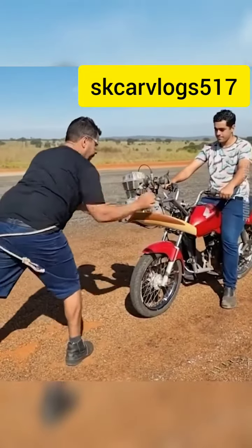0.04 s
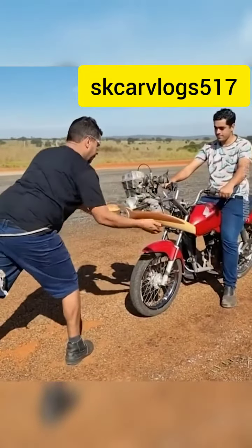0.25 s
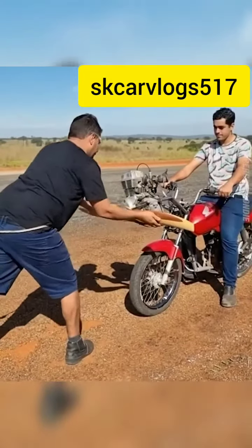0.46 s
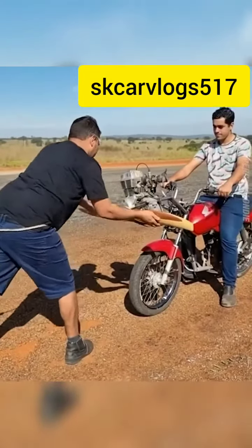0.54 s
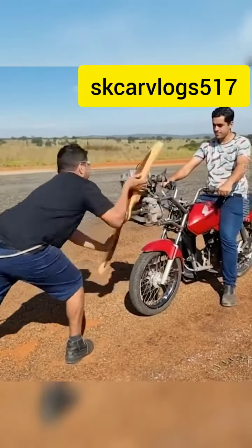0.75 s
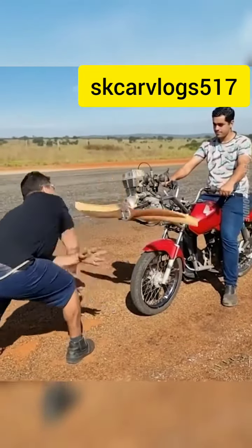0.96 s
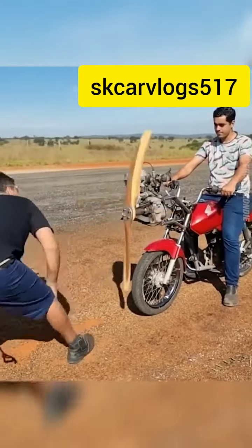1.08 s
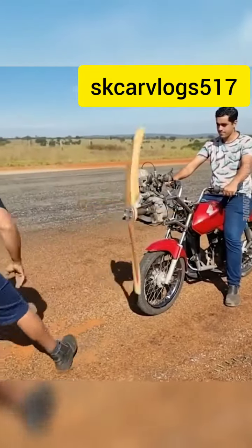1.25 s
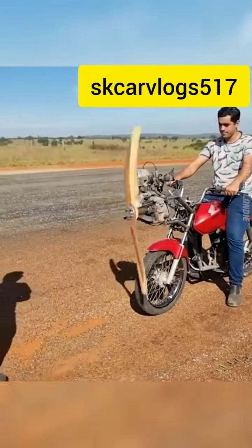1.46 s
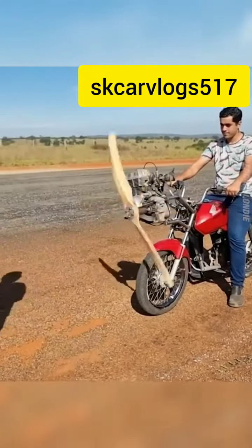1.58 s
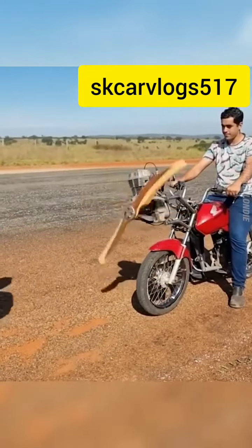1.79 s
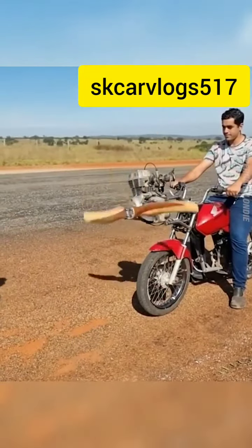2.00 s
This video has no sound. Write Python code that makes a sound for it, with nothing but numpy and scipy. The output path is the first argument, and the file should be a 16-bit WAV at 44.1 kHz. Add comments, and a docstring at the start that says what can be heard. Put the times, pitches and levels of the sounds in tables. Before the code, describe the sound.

A small motorcycle engine is started by hand-swinging a wooden propeller. Low, soft wind and faint ticks at about 0.24, 0.4, 0.5 and 0.8 seconds lead to a metallic clank at 0.89. A loud spitting pop follows at 0.98, then a weak puff at 1.1. From 1.2 hollow, whooping exhaust chugs quicken and strengthen, with rattles and airy churning, still running at 2.0. Open, dry outdoor space.

```python
"""Hand-swung piston engine start

A small engine, swung by its wooden propeller, clanks, pops, catches and chugs ever faster in the open.
Each firing is a short rising whoop: a pressure drop and a swept whistle ring the silencer chambers.
Valve spits are bursts of noise; gear rattles are volleys of knocks through casing resonances, with a few
ringing pings. Shaped noise makes the churn and hiss of the turning engine and the low wind with its rustle.
"""
import sys
import numpy as np
from scipy import signal
from scipy.fft import rfft, irfft, next_fast_len
from scipy.io import wavfile
from scipy.ndimage import uniform_filter1d, map_coordinates

SR = 44100
rng = np.random.default_rng(int(sys.argv[2]) if len(sys.argv) > 2 else 0)


def volts_from_decibels(level):
    """Turn decibel levels (scalar or array-like) into linear amplitude factors."""
    exponent = np.asarray(level, float) / 20
    return 10 ** exponent


def materialize(psi):
    """Save the field psi as 16-bit PCM at rate SR to the path in sys.argv[1].

    A 1-D psi becomes a single channel; in a 2-D psi each row is a channel.
    """
    bounded = np.clip(np.atleast_2d(psi).T, -1, 1)
    quanta = np.round(bounded * 32767).astype(np.int16)
    wavfile.write(sys.argv[1], SR, quanta)


N = 89611

# Exhaust firings. Each row: start in seconds [s], relative level [dB], whistle sweep [Hz per ms],
# pressure drop relative to the whistle [dB].
FIRINGS = [(.986, -9.5, 52.8, 19.5), (1.0979, -27, 31.5, 27), (1.202, -17, 34.6, 22.5),
           (1.3051, -13, 48, 19), (1.3879, -14, 46.5, 19.5), (1.4681, -10, 57, 16),
           (1.5419, -9.5, 58.6, 16.5), (1.6148, -10.5, 59.3, 18.5), (1.6828, -8.4, 65, 16),
           (1.748, -9, 64.5, 17), (1.813, -9, 65.2, 14.8), (1.8746, -8.5, 63, 13), (1.9383, -8.5, 70.3, 15),
           (1.9939, -6.5, 76.6, 14.5)]
# Silencer chambers. Each row: resonance [Hz], width [Hz], gain [dB].
SILENCER_MODES = [(313, 106, 1), (555, 64, .8), (746, 56, 3.8), (860, 125, 4.3), (1200, 110, 1)]
# Gas sloshing in the silencer box. One row: resonance [Hz], width [Hz], gain [dB].
THUMP_MODE = (73.4, 24, -16.5)
WHISTLE_START_HZ, WHISTLE_END_HZ, WHISTLE_FADE_HZ = 203, 1170, 130
WHISTLE_REF_HZ, WHISTLE_FALL_POWER = 500, 1.64  # level falls as this power of pitch
WHISTLE_RISE_S, WHISTLE_PHASE_TURNS, DROP_PEAK_S = .0052, .66, .0038
AFTERRING_DB, AFTERRING_T60_S, AFTERRING_DELAY_S = -16, .045, .005
EXHAUST_PAN_DB, EXHAUST_SCATTER_DB = -2.5, -9.5  # pan: left over right

# Valve spits just ahead of firings. Each row: start in seconds [s], level [dB].
SPITS = [(0.982, -10.5), (1.196, -30), (1.303, -25.5), (1.384, -31), (1.464, -26.5), (1.538, -28.5),
         (1.609, -26), (1.679, -25.5), (1.743, -27.5), (1.811, -28.5), (1.871, -34.5), (1.934, -28.5),
         (1.990, -22)]
# Spit spectrum. Each row: frequency [Hz], relative density [dB per Hz].
SPIT_SPECTRUM = [(710, -19.5), (1200, -14), (2070, -7), (2520, -13.5), (3200, -18.5), (3820, -22),
                 (7190, -20), (10500, -36.5), (14100, -26.5), (15100, -36), (16300, -37)]
SPIT_RISE_S, SPIT_T60_S = 0.0016, 0.038

# Gear and valve-train rattles. Each row: start in seconds [s], level [dB], hold [s].
RATTLES = [(0.8886, -25, 0.016), (.925, -54, 0.0075), (0.9406, -39.5, 0.0051), (0.944, -38, 0.0033),
           (0.969, -36.5, 0.0095), (0.981, -21, 0.015), (1.057, -35.5, 0.0067), (1.132, -42.5, 0.0087),
           (1.155, -38, 0.005), (1.194, -33, 0.0097), (1.216, -42.5, 0.0049), (1.27, -44, 0.015),
           (1.329, -27, 0.0034), (1.339, -37.5, 0.0038), (1.349, -44, 0.0078), (1.391, -40, 0.034),
           (1.468, -31.5, 0.02), (1.545, -35.5, 0.0056), (1.612, -35, 0.0016), (1.681, -42.5, 0.0081),
           (1.704, -39.5, 0.015), (1.745, -60, 0.003), (1.813, -41.5, 0.013), (1.857, -46, 0.017),
           (1.94, -44, 0.0091), (1.99, -61, 0.0063)]
# Light knocks while the blade is set. Each row: time in seconds [s], level ahead of the tick low-pass [dB].
TICKS = [(0.24, -39.5), (.249, -54), (0.391, -41), (0.398, -46), (0.523, -32.5), (.528, -57), (.795, -44)]
# Engine casing. Each row: resonance [Hz], width [Hz], gain [dB].
CASING_MODES = [(770, 64, -0.5), (1067, 63, -1), (1384, 95, 4), (1640, 202, 0), (2095, 237, 1.5),
                (2410, 340, -9.5), (2550, 108, -7.5), (4470, 970, -20.5), (4820, 400, -16),
                (6220, 730, -22), (6820, 800, -24.5)]
# Ringing knocks on one part of the gear. Each row: start in seconds [s], pitch [Hz], level [dB], T60 [s].
PINGS = [(.889, 1384, -15.5, 0.023), (0.895, 1410, -20, 0.063), (.946, 1390, -33, 0.055),
         (1.193, 1405, -32.5, 0.067), (1.3396, 4780, -30, 0.021), (1.35, 1424, -31, .06),
         (1.612, 2294, -29, 0.017), (1.68, 2140, -28, 0.026), (1.709, 2030, -31, 0.036)]
KNOCK_RISE_S, RATTLE_T60_S, KNOCKS_PER_S, KNOCK_SCATTER_DB = .0006, .03, 4000, 1.5
CASING_LOW_HZ, CASING_TOP_HZ, TICK_TOP_HZ, FIRST_KNOCK_DB = 626, 6900, 3470, 4
GEAR_PAN_DB, GEAR_SCATTER_DB = 0, -6.5

# Turning engine. Each row: time in seconds [s], churn level ahead of CHURN_GAIN_DB [dB], hiss level [dB].
RUNNING = [(.885, -46, -86), (.93, -54, -77), (.965, -51.5, -66), (1.0, -34.5, -55), (1.04, -51, -64),
           (1.08, -41, -64), (1.12, -56.5, -72), (1.18, -53.5, -68), (1.25, -53, -61), (1.3, -41, -63),
           (1.37, -42.5, -61.5), (1.44, -44.5, -58.5), (1.52, -48.5, -61.5), (1.6, -51, -59.5),
           (1.72, -48.5, -60), (1.8, -48, -62), (1.9, -49.5, -63), (2.03, -49, -71)]
# Churn spectrum. Each row: frequency [Hz], relative density [dB per Hz].
CHURN_SPECTRUM = [(18, -41), (45, 5.5), (187, -2.5), (483, -5), (786, -2.5), (1370, -1.5), (1770, -4),
                  (2130, -9.5), (2940, -13), (6170, -22.5), (7600, -23.5), (9880, -44), (16700, -120)]
# Hiss spectrum. Each row: frequency [Hz], relative density [dB per Hz].
HISS_SPECTRUM = [(6000, -57), (7800, -3), (9500, -3), (11500, -0.5), (14000, 4.5), (15200, -4),
                 (16300, -23), (17000, -90)]
# Engine noise width. Each row: frequency [Hz], left-right correlation [-1 to 1].
ENGINE_CORRELATION = [(40, 0.31), (150, 1), (600, 0.57), (2000, 0.44), (5000, 0.22), (10000, 0.33)]
CHURN_GAIN_DB, CHURN_START_S, CHURN_RAMP_S = 5.5, .885, .0112

# Wind. Each row: time in seconds [s], relative strength [dB], extra rustle [dB].
WIND = [(0, -52, 6.5), (.08, -48, 1.5), (.15, -50, 1.4), (.25, -47.5, 4.5), (.36, -47, 1.1), (.43, -50, 4),
        (.5, -43, 4), (.58, -53, 3), (.68, -49, 3), (.8, -46.5, 2.5), (.9, -45.5, 7), (1.2, -47.5, -1),
        (1.6, -49.5, 11), (2.03, -50, -15)]
# Breeze spectrum. Each row: frequency [Hz], relative density [dB per Hz].
BREEZE_SPECTRUM = [(15, -30), (35, -26), (86, -18.5), (162, -1), (291, -2.5), (401, -8), (537, -19),
                   (700, -37), (910, -50), (1540, -120)]
# Rustle spectrum. Each row: frequency [Hz], relative density [dB per Hz].
RUSTLE_SPECTRUM = [(290, -36), (500, -2), (1450, -16), (1970, -19.5), (3220, -25.5), (4920, -32),
                   (10500, -47), (12000, -52), (15600, -78), (22000, -120)]
# Wind width. Each row: frequency [Hz], left-right correlation [-1 to 1].
WIND_CORRELATION = [(60, 0.97), (180, 1), (550, 0.94), (1650, 0.27), (4970, -0.44), (15000, 0.8)]
BREEZE_GAIN_DB, RUSTLE_GAIN_DB, WIND_PAN_DB = 2, -10, -1.3

# Narrow dips in the treble. Each row: centre [Hz], width [Hz], gain [dB].
TREBLE_DIPS = [(3300, 524, -7.5), (8090, 360, -3), (10580, 250, -19)]
MIC_LOW_HZ = 64
GROUND_T60_S, GROUND_LOW_HZ = 0.05, 203


def along(points, hz):
    """Interpolates (Hz, value) points on a log frequency axis."""
    f, v = np.transpose(points)
    return np.interp(np.log(hz + 1), np.log(f + 1), v)


def curve(rows):
    """One value per sample for each column after the time."""
    s, *cols = np.transpose(rows)
    return [np.interp(np.arange(N) / SR, s, c) for c in cols]


def unit(x):
    """Scales to rms 1."""
    return x / np.sqrt(np.mean(x ** 2) + 1e-20)


def wobble(knots_per_s):
    """Smooth random curve through normally distributed knots."""
    knots = rng.standard_normal(int(N * knots_per_s / SR) + 4)
    return map_coordinates(knots, [np.arange(N) * knots_per_s / SR])


def filtered(x, response):
    """Applies a complex response of frequency in Hz."""
    m = next_fast_len(N + SR // 2)
    return irfft(rfft(x, m) * response(np.fft.rfftfreq(m, 1 / SR)), m)[..., :N]


def resonance(f, hz, width_hz, db):
    """Response of a damped resonator that peaks at hz with the given gain."""
    return volts_from_decibels(db) * 1j * f * width_hz / (hz * hz - f * f + 1j * f * width_hz)


def pan_gains(pan_db):
    """Left and right gains, pan_db apart."""
    return volts_from_decibels(np.array([[.5], [-.5]]) * pan_db)


def rush(spectrum, correlation, patchy_db):
    """Stereo noise of rms 1 with time-frequency patches of random gain."""
    z = signal.stft(rng.standard_normal((2, N)), nperseg=512)[2]
    field = uniform_filter1d(rng.standard_normal(z.shape[1:]), 6, 0)
    field = uniform_filter1d(field, 6, 1)
    pair = signal.istft(z * volts_from_decibels(patchy_db * unit(field)), nperseg=512)[1][:, :N]

    def mid_side(hz):
        angle = np.arccos(np.clip(along(correlation, hz), -1, 1)) / 2
        return volts_from_decibels(along(spectrum, hz)) * np.array([np.cos(angle), np.sin(angle)])

    mid, side = filtered(pair, mid_side)
    return unit(np.array([mid + side, mid - side]))


def bursts(rows, rise_s, t60_s):
    """Sums envelopes of (s, dB, held s) rows: rise, hold, exponential decay."""
    t = np.arange(N) / SR
    envelope = np.zeros(N)
    for s, db, held_s in rows:
        decay = volts_from_decibels(db - 60 * np.clip(t - s - held_s, 0, None) / t60_s)
        envelope += decay * (1 - np.exp(-np.clip(t - s, 0, None) / rise_s))
    return envelope


def placed(x, pan_db, scatter_db):
    """Panned, with short ground scatter, new each 0.1 s, that differs between the channels."""
    step = SR // 10
    t, wet = np.arange(step) / SR, np.zeros((2, N + 2 * step))
    for k in range(0, N, step):
        tail = rng.standard_normal((2, step)) * volts_from_decibels(-60 * t / GROUND_T60_S)
        piece = signal.fftconvolve(x[None, k:k + step], tail / np.linalg.norm(tail[0]), axes=1)
        wet[:, k:k + piece.shape[1]] += piece
    wet = filtered(wet[:, :N], lambda f: 1j * f / (GROUND_LOW_HZ + 1j * f))
    return (x + volts_from_decibels(scatter_db) * wet) * pan_gains(pan_db)


def exhaust():
    """At each firing pressure drops and the opening valve whistles upward; both ring the silencer."""
    size = 8192
    f, t = np.fft.rfftfreq(size, 1 / SR), np.arange(size) / SR
    out = np.zeros(N + size)
    box = sum(resonance(f, *mode) for mode in SILENCER_MODES) - resonance(f, *THUMP_MODE)
    for s, db, sweep_hz_per_ms, drop_db in FIRINGS:
        pitch = WHISTLE_START_HZ + 1000 * sweep_hz_per_ms * t
        swell = (1 - np.exp(-t / WHISTLE_RISE_S)) * (pitch / WHISTLE_REF_HZ) ** -WHISTLE_FALL_POWER
        swell *= (1 - np.tanh((pitch - WHISTLE_END_HZ) / WHISTLE_FADE_HZ)) / 2
        turns = (pitch + WHISTLE_START_HZ) / 2 * t + WHISTLE_PHASE_TURNS
        whistle = swell * np.sin(2 * np.pi * turns)
        drop = volts_from_decibels(drop_db) * t / DROP_PEAK_S * np.exp(-t / DROP_PEAK_S)
        # the shell's irregular afterring
        after = rng.standard_normal(size) * volts_from_decibels(-60 * t / AFTERRING_T60_S) * (t > AFTERRING_DELAY_S)
        path = box * (1 + volts_from_decibels(AFTERRING_DB) * rfft(after / np.linalg.norm(after)))
        out[round(s * SR):][:size] += volts_from_decibels(db) * irfft(rfft(whistle - drop) * path, size)
    return placed(out[:N], EXHAUST_PAN_DB, EXHAUST_SCATTER_DB)


def spits():
    """A short wide hiss as the valve cracks open: enveloped noise."""
    envelope = bursts([(s, db, 0) for s, db in SPITS], SPIT_RISE_S, SPIT_T60_S)
    return envelope * rush(SPIT_SPECTRUM, ENGINE_CORRELATION, patchy_db=6.0)


def casing(f):
    """Casing response: resonances of alternating sign, with the bass and top rolled off."""
    modes = sum((-1) ** k * resonance(f, *mode) for k, mode in enumerate(CASING_MODES))
    return modes / (1 + (CASING_LOW_HZ / (f + 1)) ** 4) / (1 + (f / CASING_TOP_HZ) ** 12)


def rattles():
    """Volleys of small knocks, each led by a single knock, and soft single ticks ring the casing."""
    knocks = (rng.random(N) < KNOCKS_PER_S / SR) * np.sign(rng.standard_normal(N))
    knocks = knocks * volts_from_decibels(KNOCK_SCATTER_DB * wobble(150))
    blows = knocks / np.std(filtered(knocks, casing)) * bursts(RATTLES, KNOCK_RISE_S, RATTLE_T60_S)
    click_peak = np.abs(filtered(np.arange(N) == 0, casing)).max()
    for s, db, _ in RATTLES:
        blows[round(s * SR)] -= volts_from_decibels(db + FIRST_KNOCK_DB) / click_peak
    ticks = np.zeros(N)
    for s, db in TICKS:
        ticks[round(s * SR)] = -volts_from_decibels(db) / click_peak
    blows += filtered(ticks, lambda f: 1 / (1 + 1j * f / TICK_TOP_HZ) ** 2)
    return placed(filtered(blows, casing), GEAR_PAN_DB, GEAR_SCATTER_DB)


def pings():
    """Each knock rings one part of the gear as a decaying sine."""
    t = np.arange(N) / SR
    rings = np.zeros(N)
    for s, hz, db, t60_s in PINGS:
        rings += bursts([(s, db, 0)], KNOCK_RISE_S, t60_s) * np.sin(2 * np.pi * hz * (t - s))
    return placed(rings, GEAR_PAN_DB, GEAR_SCATTER_DB)


def churn():
    """Air pumped through the turning engine: an uneven rush with a hiss on top."""
    on = np.clip((np.arange(N) / SR - CHURN_START_S) / CHURN_RAMP_S, 0, 1)
    churn_db, hiss_db = curve(RUNNING)
    hiss = volts_from_decibels(hiss_db + 2.5 * wobble(40)) * rush(HISS_SPECTRUM, ENGINE_CORRELATION, patchy_db=2.5)
    air_gain = volts_from_decibels(churn_db + CHURN_GAIN_DB + 2.8 * wobble(44.74))
    air = air_gain * rush(CHURN_SPECTRUM, ENGINE_CORRELATION, patchy_db=2.5)
    return on * (air + hiss)


def wind():
    """A low lumpy breeze and the rustle it raises: two bands of noise under one strength curve."""
    strength_db, rustle_db = curve(WIND)
    breeze_gain = volts_from_decibels(BREEZE_GAIN_DB + 0.51 * wobble(14.2) + 0.51 * wobble(36.0))
    breeze = breeze_gain * rush(BREEZE_SPECTRUM, WIND_CORRELATION, patchy_db=0.5)
    rustle_gain = volts_from_decibels(RUSTLE_GAIN_DB + rustle_db + 0.44 * wobble(25))
    rustle = rustle_gain * rush(RUSTLE_SPECTRUM, WIND_CORRELATION, patchy_db=2.0)
    return volts_from_decibels(strength_db) * pan_gains(WIND_PAN_DB) * (breeze + rustle)


def scene():
    """Sums all sources, in stereo."""
    return exhaust() + spits() + rattles() + pings() + churn() + wind()


def band_limit(x):
    """A steep low-pass at the top of the band."""
    return signal.sosfilt(signal.butter(12, 16440, fs=SR, output="sos"), x)


def record(dry):
    """Microphone: second-order bass cut and narrow treble dips."""
    def microphone(f):
        dips_db = sum(db * np.exp(-((f - hz) / width_hz) ** 2) for hz, width_hz, db in TREBLE_DIPS)
        bass_cut = f * f / (f * f - MIC_LOW_HZ ** 2 - 1.3j * f * MIC_LOW_HZ)
        return volts_from_decibels(dips_db) * bass_cut

    mix = filtered(dry, microphone)
    return band_limit(mix)


dry = scene()
out = record(dry)
materialize(out)
```